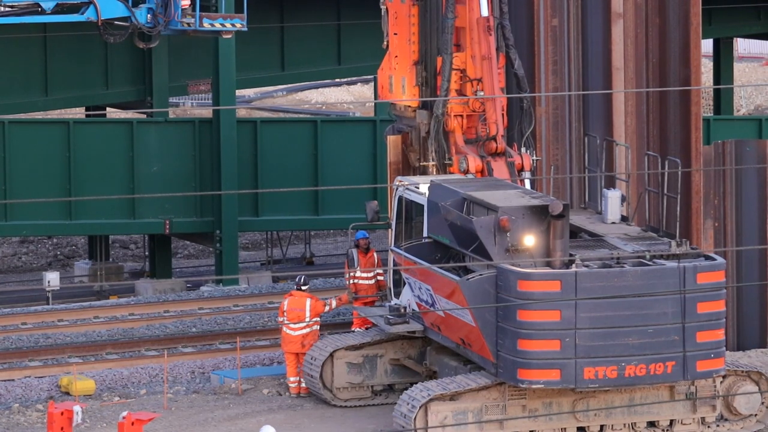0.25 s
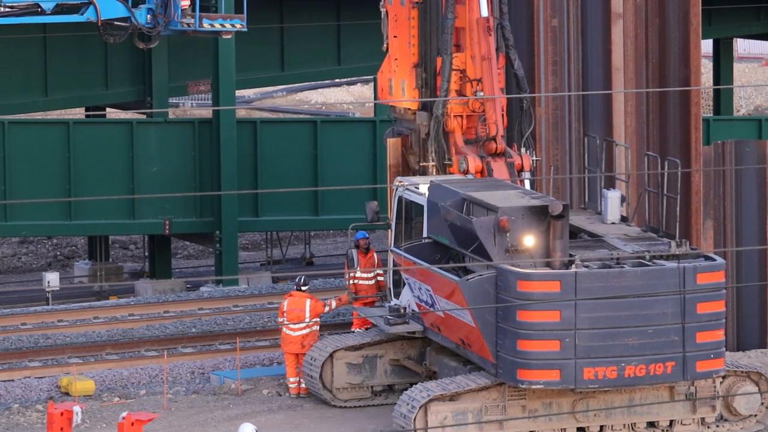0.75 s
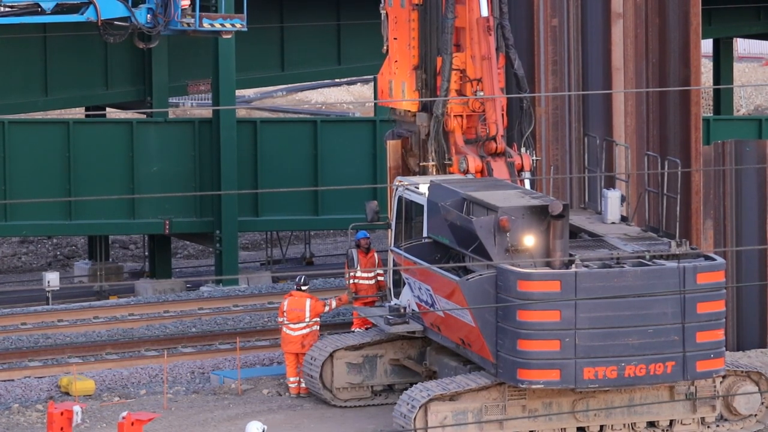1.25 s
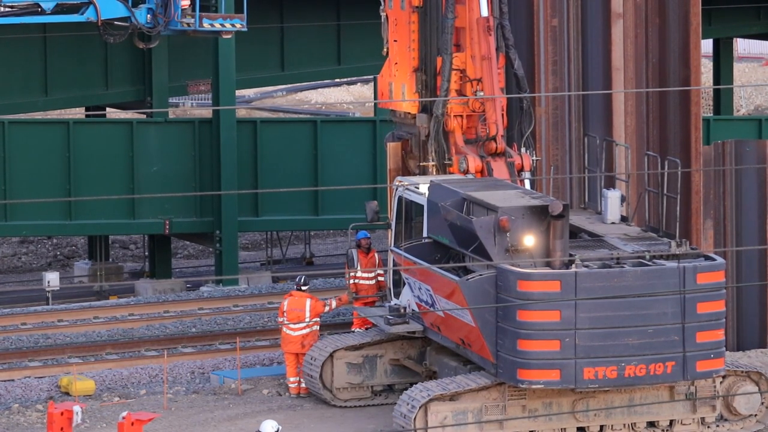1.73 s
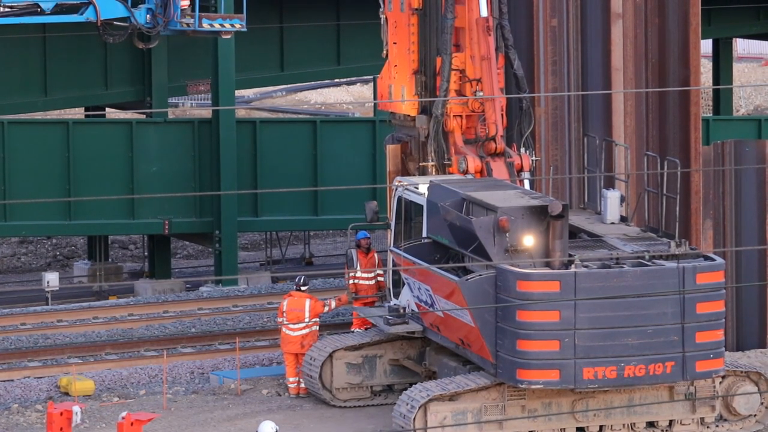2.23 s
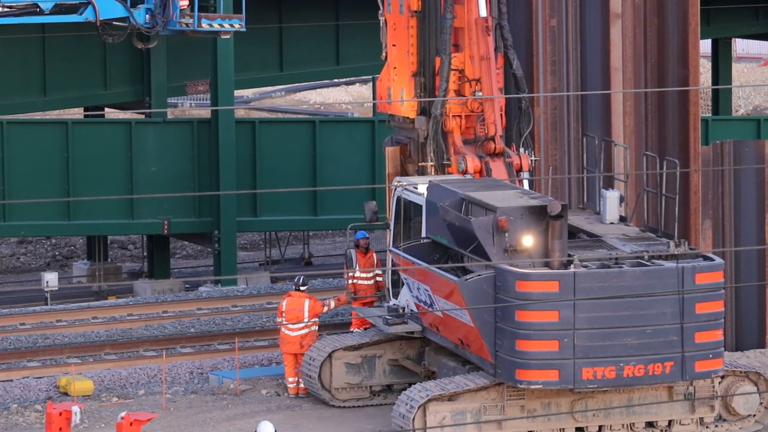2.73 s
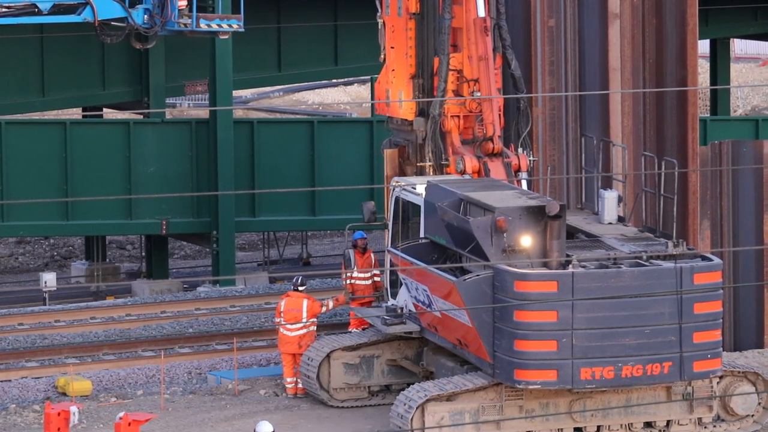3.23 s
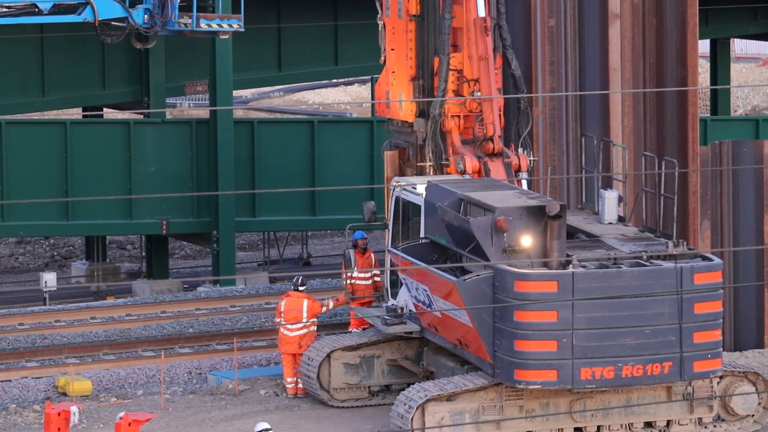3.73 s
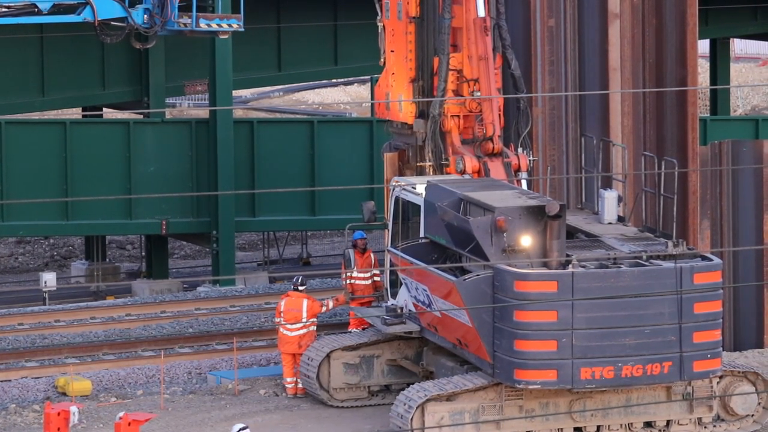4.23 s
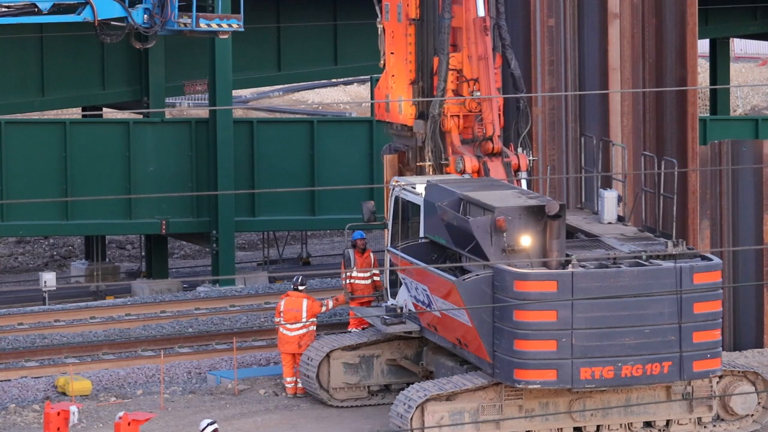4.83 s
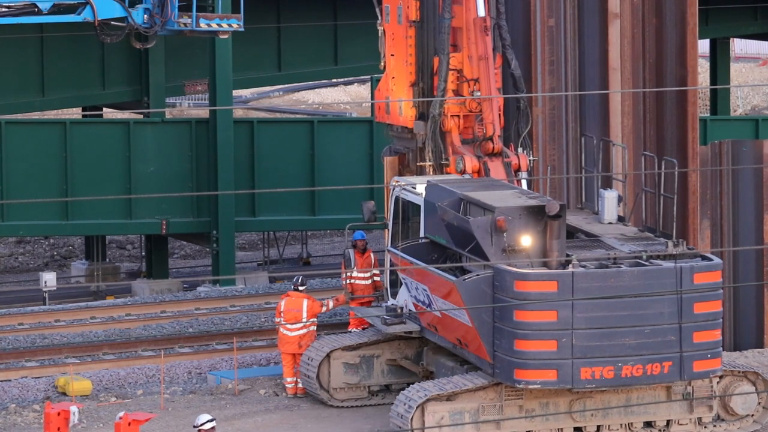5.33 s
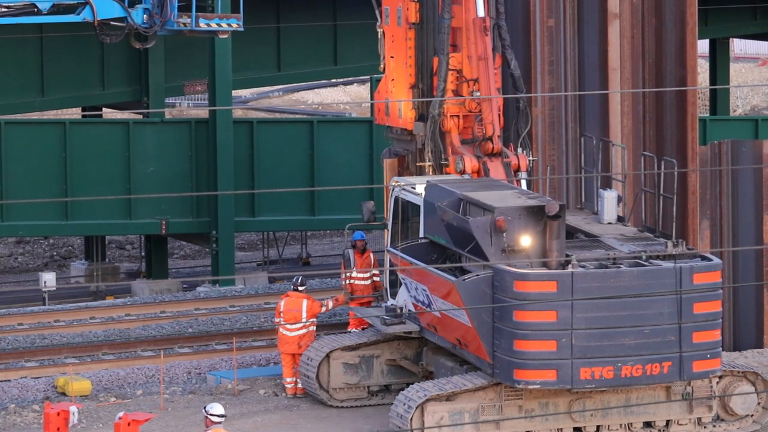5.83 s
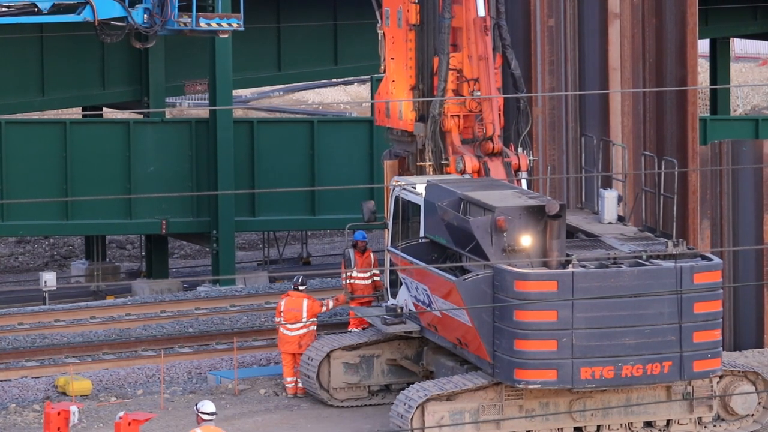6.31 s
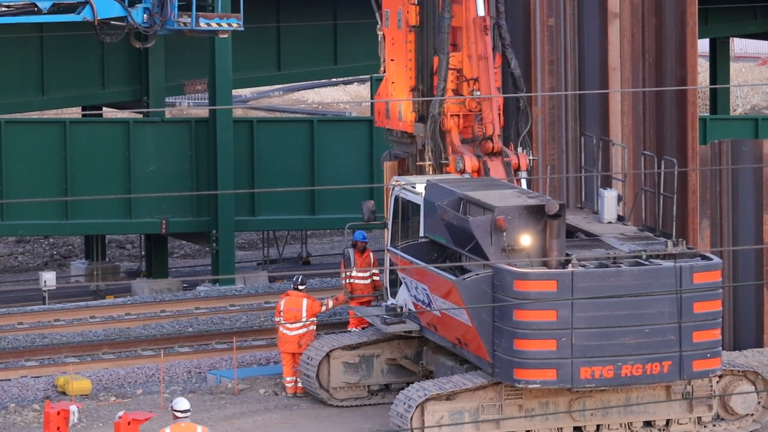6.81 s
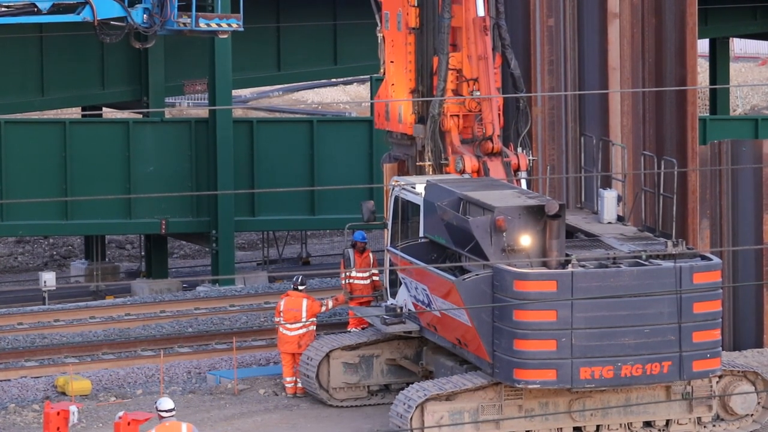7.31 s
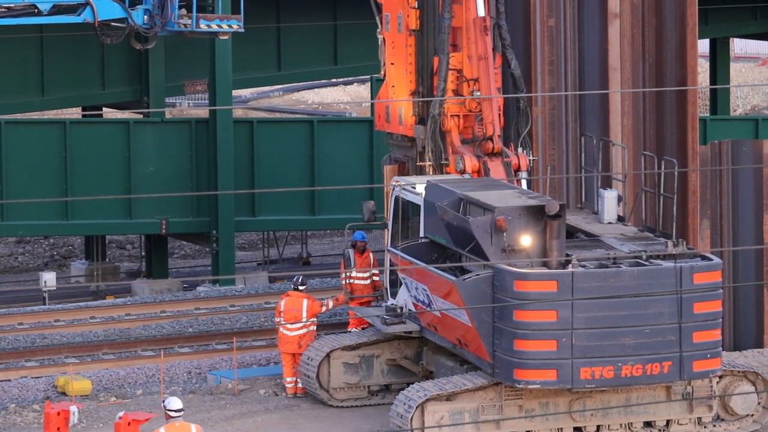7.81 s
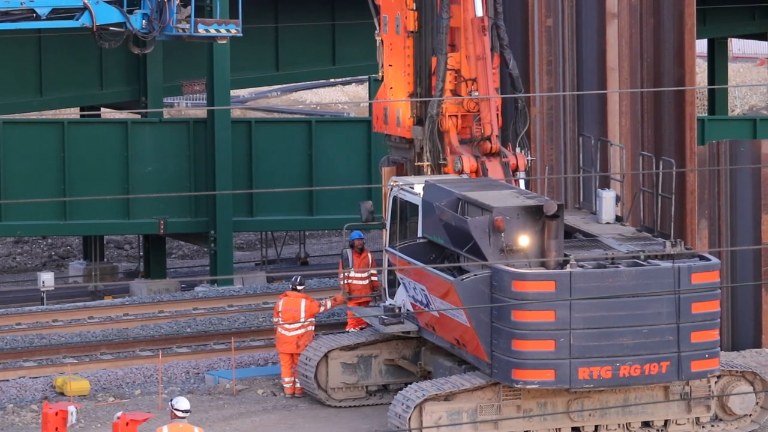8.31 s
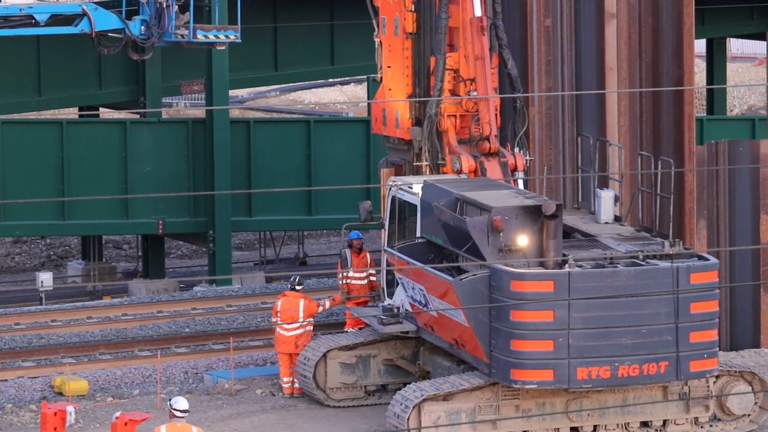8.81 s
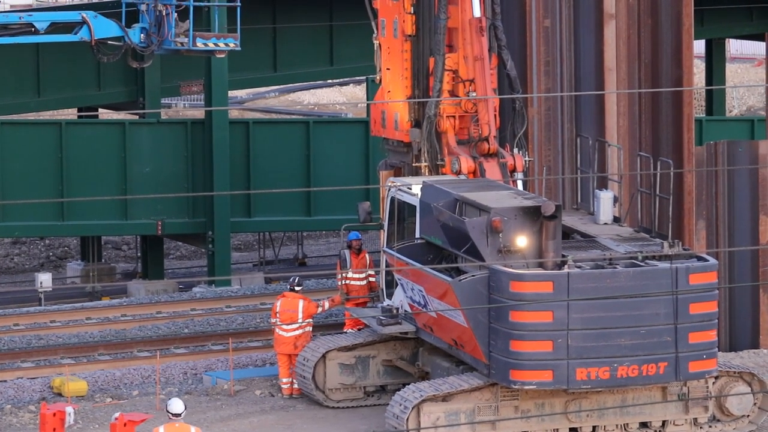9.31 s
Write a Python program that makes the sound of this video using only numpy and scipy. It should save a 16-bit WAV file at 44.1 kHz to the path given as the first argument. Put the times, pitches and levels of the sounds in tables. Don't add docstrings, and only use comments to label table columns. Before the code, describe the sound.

A vibratory hammer buzzes hard and steadily on a steel sheet pile, metal rattling fast and ringing, over an even diesel roar outdoors.

```python
import sys
import numpy as np
from scipy import signal
from scipy.fft import rfft, irfft, next_fast_len
from scipy.io import wavfile
from scipy.ndimage import uniform_filter1d, map_coordinates

SR = 44100
rng = np.random.default_rng(int(sys.argv[2]) if len(sys.argv) > 2 else 0)


def gain_from_decibels(decibels):
    exponent = np.asarray(decibels, float) / 20
    return 10 ** exponent


def pcm_store(signal):
    levels = np.round(np.clip(np.atleast_2d(signal), -1, 1) * 32767)
    wavfile.write(sys.argv[1], SR, levels.astype(np.int16).T)


N = 421596

# time in seconds, stony share 0-1, firm share 0-1, loss of the high orders in dB.
GROUND = [(0, .85, 0, 14), (1.1, .85, 0, 14), (1.35, .6, 0, 14), (1.9, .65, 0, 14), (2.2, 1, 0, 13),
          (3.35, 1, 0, 12), (3.5, 0, 0, 8), (4.05, 0, 0, 0), (5.35, 0, 0, 0), (5.75, 0, 1, 0),
          (9.56, 0, 1, 0)]


def unit(x):
    return x / np.sqrt(np.mean(x ** 2) + 1e-20)


def along(points, hz):
    f, v = np.transpose(points)
    return np.interp(np.log(hz + 1), np.log(f + 1), v)


def curves(rows):
    s, *cols = np.transpose(rows)
    return [np.interp(np.arange(N) / SR, s, c) for c in cols]


def spells(rows):
    t = np.arange(0, N + 64, 64) / SR
    total = 0 * t
    for centre, length, size in rows:
        total = total + size * np.exp(-(2 * (t - centre) / length) ** 2)
    return np.repeat(total, 64)[:N]


def wobble(rate, size=1):
    rate = min(rate, 40)
    knots = rng.standard_normal(int(N * 40 / SR) + 4)
    return map_coordinates(knots, [np.arange(0, N, size) * rate / SR])


def filtered(x, response):
    m = next_fast_len(N + SR // 2)
    return irfft(rfft(x, m) * response(np.fft.rfftfreq(m, 1 / SR)), m)[..., :N]


def hum(turns, speed, bounce):
    # multiple of shaft rate, loose soil in dB, firm soil in dB.
    low_orders = [(1, -11.5, -14.5), (2, -17, -15.5), (3, 2, 0), (4, -6, -5.5), (5, -7, -12.5),
                  (6, -36, -19), (7, -6, -11), (8, -0.5, -2), (9, -16.5, -16), (10, -16, -43),
                  (11, -6.5, -10.5), (12, -26, -9.5), (13, -2.5, -3), (14, -3.5, -3), (15, -11, -16)]
    # multiple of shaft rate, level in dB.
    bounce_orders = [(0.5, -33), (1, -10.5), (1.5, -26), (2, -26), (2.5, -4), (3, 1.5), (3.5, -9), (4, -2),
                     (4.5, -7), (5, -5.5), (5.5, -32), (6, -32), (6.5, -17.5), (7, -0.5), (7.5, -8.5),
                     (8, -10.5), (8.5, -41), (9, -8), (9.5, -20), (10, -12.5), (10.5, -18), (11, -10.5),
                     (11.5, -29), (12, -8), (12.5, -5), (13, -7), (13.5, -7.5), (14, -9), (14.5, -14),
                     (15, -4.5)]
    # centre in Hz, width in Hz, gain in dB.
    lifts = [(913, 15, 2.5), (1159, 20, 7), (1504, 14, 1)]
    # centre in seconds, length in seconds, gain in dB.
    chatter = [
        (.5, 1, 3.5),
        (1.6, 1, 14.5),
    ]
    # centre in seconds, length in seconds, gain in dB.
    loads = [(1.1, 0.56, 0.3), (1.75, .7, -4.5), (3.5, 0.33, -1.7), (6.8, 0.5, -0.7), (7.9, 0.81, 1.8),
             (8.6, .5, 0.3)]
    comb_loose_db, comb_firm_db, comb_scatter_db = -22, -36, 1.5
    lift_firm_db = -7
    steady_wander = .45

    step = 8
    turns, speed, mix = turns[::step], speed[::step], np.clip(bounce[::step], 0, 1.3)
    stony, grip, loss_db = np.array(curves(GROUND))[:, ::step]
    calm = 1 - (1 - steady_wander) * (1 - grip) * (1 - stony)
    chatter_db = spells(chatter)[::step]
    low = {round(k): levels for k, *levels in low_orders}
    bouncing = dict(bounce_orders)
    pair = np.zeros((2, len(turns)))
    for k in sorted({*range(1, 41), *bouncing}):
        if k in low:
            loose_db, firm_db = low[k]
            db = (1 - grip) * loose_db + grip * firm_db
        elif k in bouncing:
            db = -25.0
        else:
            scatter_db = comb_scatter_db * rng.standard_normal()
            level = gain_from_decibels(comb_loose_db + grip * (comb_firm_db - comb_loose_db) + scatter_db)
            for centre, width, gain_db in lifts:
                detuning = 2 * (k * speed - centre) / width
                level = level + gain_from_decibels(gain_db + lift_firm_db * grip) / np.hypot(1, detuning)
            db = 20 * np.log10(level)
        if k in bouncing:
            hop = stony if k in low else mix
            db = db + hop * (bouncing[k] - db)
        else:
            db = db - loss_db
        if k % 1 > 0 and 6 < k < 14:
            db = db + chatter_db
        sway_db = min(.5 + .08 * k, 1.5) * wobble(3.1, size=step)
        start = [[k * k / 4], [k * k / 4 + .25 + .08 * rng.standard_normal()]]
        wander = calm * min(0.043 * k, .07) * wobble(4.5, size=step)
        pair += gain_from_decibels(db + sway_db) * np.sin(2 * np.pi * (k * turns + start + wander))
    level_db = -32.5 - 0.6 * wobble(1.5, size=step) + spells(loads)[::step]
    return signal.resample_poly(np.sqrt(2) * gain_from_decibels(level_db) * pair, step, 1, axis=1)[:, :N]


def repeating(turns, period, drift):
    size = 1160 * period
    shapes = rng.standard_normal((2, 60, size))
    place = (turns / period % 1 * size).astype(int) % size
    age = np.arange(N) / SR * np.clip(drift, .1, 6)
    old, fade = age.astype(int), age % 1 * np.pi / 2
    return np.cos(fade) * shapes[:, old, place] + np.sin(fade) * shapes[:, old + 1, place]


def rattle(turns, bounce, repeat, firm):
    # centre in seconds, length in seconds, strength of the limp, its
    limps = [(1.5, 0.64, 1), (1.85, 0.53, .7), (3.0, 0.15, -0.61), (3.75, 0.86, -0.57), (6.35, 0.22, 0.1),
             (7.4, 0.25, -0.78), (7.9, 0.34, -.5), (8.5, 0.53, -1.6), (9.3, .5, -0.83)]
    # centre in seconds, length in seconds, burst depth in dB.
    throbs = [(.45, .6, 1.8), (1.0, 0.43, 0), (3.7, 0.55, .6), (4.35, 0.14, -2.5), (4.9, 0.78, 0.5),
              (5.2, .3, -1.5), (7.3, 0.56, 1.5), (8.45, 0.42, -0.5), (9.3, 0.25, 0.5)]
    limp = spells(limps)
    throb_db = 1.35 + 0.4 * firm + spells(throbs)

    odd = np.clip(.5 * bounce + 0.11 * abs(limp), 0, 1)
    each_turn = repeating(turns, period=1, drift=1.588)
    every_second = repeating(turns, period=2, drift=3.2)
    same = np.sqrt(1 - odd) * each_turn + np.sqrt(odd) * every_second
    repeat = np.clip(repeat, 0, 1)
    contacts = np.sqrt(repeat) * same + np.sqrt(1 - repeat) * rng.standard_normal((2, N))

    angle = 2 * np.pi * (turns - .27)
    uneven = limp * np.cos(angle / 2 + 2.7)
    burst = np.cos(angle) + 0.35 * np.cos(2 * angle + 0.87) + 0.59 * uneven
    since = (turns - .11) % 1
    blow = np.exp(-since / 0.06) * gain_from_decibels(-3.5 + throb_db + 10.5 * uneven + 2.5 * wobble(35))
    force = gain_from_decibels(throb_db * burst + 0.17 * wobble(30) + 0.87 * wobble(10)) + blow
    return contacts * force / np.sqrt(np.abs(uniform_filter1d(force ** 2, size=SR // 5)))


def pile(blows, steady):
    mode_hz = [522, 902, 1145, 1488, 1955, 2503, 2828, 3355, 3790, 4890, 5625, 6070, 7760, 8790, 9660,
               11900, 15080]
    # width in Hz, level in dB.
    mode_shape = [(50.6, -7), (22.9, 1), (31.3, -7.5), (26.5, -4.5), (62, -12), (41.7, -13.5),
                  (29.6, -12.5), (37.2, 1), (29.6, -13.5), (44.4, -4.5), (40.6, -8.5), (60, -13.5),
                  (45, -20.5), (200, -18.5), (110, -26), (510, -23), (150, -42)]
    group_hz = [0, 700, 1020, 1330, 2660, 3080, SR]
    parts_db = [
        -34.5,
        -28.5,
        -28.5,
        -24,
        -33,
        -25.5,
    ]
    depth_db = [
        -2,
        -3.5,
        -9,
        -4,
        0,
        4.5,
    ]
    swells = {0: [(.55, 0.23, -10), (1.5, 0.44, 6.5), (3.1, 1, 7), (4.0, .5, 9), (4.9, 0.73, -23),
              (5.65, 0.58, 4.5)], 1: [(3.5, 0.28, 1), (6.4, 0.94, 4), (8.0, 0.2, 7.5), (8.8, 0.41, 7)],
              2: [(1.0, .4, 1.5), (2.65, 0.41, 5.5), (3.4, 0.61, 8), (4.7, 1.2, -4), (8.15, 0.44, 6.5),
              (9.05, 0.17, 8.5)], 3: [(.7, 0.53, -2), (1.5, 0.58, -4), (2.3, 0.36, 1), (3.65, 0.17, -0.5),
              (4.7, 1, -1.5), (6.5, 0.27, 3), (9.2, 0.12, 5)], 4: [], 5: [(.1, 0.32, 3), (1.7, 0.36, 1.5),
              (5.9, 0.36, 1), (9.35, 0.14, -0.5)]}
    # centre in seconds, length in seconds, gain in dB.
    sings = [(.4, .4, 10), (1.5, 0.61, 23), (3.65, 0.32, 18), (4.35, 0.37, 21), (4.9, 0.59, 16.5),
             (5.45, .3, 21), (5.95, .4, 16), (6.25, 0.27, 17), (6.9, 0.6, 16.5), (7.6, .4, 14),
             (8.2, 0.83, 16.5), (9.2, .5, 12)]
    # frequency in Hz, density in dB per Hz.
    clatter = [(90, -20), (200, 5), (400, -0.5), (720, -0.5), (1000, 6), (1700, -17), (3400, 4), (5700, -7),
               (7000, -5.5), (9000, -11), (10500, -16), (12000, -8), (14000, -52), (16000, -25)]
    flange_damping = 0.77
    sing_hz, sing_width_hz, sing_db = 2828, 14, -46.5

    def mode(f, centre, width):
        return 1j * f * width / (centre ** 2 - f * f + 1j * f * width)

    def ringing(f):
        total = 0
        for k, (centre, (width, db)) in enumerate(zip(mode_hz, mode_shape)):
            total = total + (-1) ** k * gain_from_decibels(db) * mode(f, centre, width)
        return total * ((f >= edges[:-1]) & (f < edges[1:]))

    edges = np.reshape(group_hz, (-1, 1, 1))
    parts = filtered(blows, ringing)
    out = gain_from_decibels(-27.5 - 0.5 * steady) * unit(filtered(blows, lambda hz: gain_from_decibels(along(clatter, hz))))
    swell_db = [spells(rows) for rows in swells.values()]
    swell_db[2] = swell_db[2] - flange_damping * np.maximum(swell_db[0], 0)
    depth = np.arange(N) / N - .5
    for part, rest_db, deep_db, more_db in zip(parts, parts_db, depth_db, swell_db):
        flutter_db = .6 * np.repeat(wobble(5.5, size=64), 64)[:N]
        out = out + gain_from_decibels(rest_db + deep_db * depth + more_db + flutter_db) * unit(part)
    song = filtered(blows, lambda f: mode(f, sing_hz, sing_width_hz))
    return out + gain_from_decibels(sing_db + spells(sings)) * unit(song)


def engine():
    # frequency in Hz, density in dB per Hz.
    roar_db = [(11, -45), (18, -25), (108, -5), (218, -8), (515, 0.5), (723, -7), (890, -3), (1500, 0.5),
               (1750, -3.5), (3440, -6.5), (5780, -17), (7900, -18.5), (9000, -19.5), (11700, -55),
               (19800, -120)]
    roar = filtered(rng.standard_normal((2, N)), lambda hz: gain_from_decibels(along(roar_db, hz)))
    return gain_from_decibels(-24.5 + 0.18 * wobble(4.3)) * unit(roar)


def spread(pair):
    # frequency in Hz, correlation of left and right.
    likeness = [(60, 1), (130, 0.98), (290, 0.97), (640, 0.88), (1410, 0.84), (3100, 0.65), (5500, 0.61),
                (7500, 0.061), (15000, 0.13)]

    def rotation(hz):
        turn = np.arccos(np.clip(along(likeness, hz), -1, 1)) / 2
        return np.array([np.cos(turn), np.sin(turn)])

    mid, side = filtered(pair, rotation)
    return np.array([mid + side, mid - side])


def scene():
    # time in seconds, shaft rate in Hz.
    shaft = [(0.0, 38.467), (0.9, 38.48), (1.6, 37.806), (2.4, 37.879), (3.0, 37.97), (3.6, 38.128),
             (4.2, 38.21), (5.15, 38.347), (5.75, 37.742), (6.3, 37.68), (7.3, 37.569), (8.1, 37.662),
             (8.8, 37.713), (9.56, 37.793)]
    speed, = curves(shaft)
    turns = np.cumsum(speed) / SR
    stony, firm, loss_db = curves(GROUND)
    steady = (1 - firm) * gain_from_decibels(-loss_db) * (1 - stony)
    bounce = .1 + .9 * stony
    repeat = .33 + .17 * steady
    blows = rattle(turns, bounce, repeat, firm)
    return spread(hum(turns, speed, bounce) + pile(blows, steady) + engine())


def starved(x, kept, together, sparse):
    window = signal.windows.kaiser_bessel_derived(2048, 4 * np.pi)
    hz, _, z = signal.stft(x, SR, window, nperseg=len(window))
    luck = rng.standard_normal((33, z.shape[1])) + together * rng.standard_normal(z.shape[1])
    luck = uniform_filter1d(luck, size=3, axis=1) + 0.5 * luck
    rank = luck.argsort(axis=1).argsort(axis=1) / z.shape[1]
    share = along(kept, hz[::32] + 345)
    share[hz[::32] < 6800] = 1
    keep = np.repeat(rank < share[:, None], 32, axis=0)[:len(hz)]
    threshold = sparse * np.clip((hz[:, None] - 5500) / 9000, 0, 1)
    strong = abs(z) >= threshold * uniform_filter1d(abs(z), size=32, axis=0)
    return signal.istft(z * keep * strong, SR, window, nperseg=len(window))[1][:N]


def roll_off(x):
    return signal.sosfilt(signal.butter(12, 15360, fs=SR, output="sos"), x)


def record(dry):
    # frequency in Hz, left minus right in dB.
    tilt = [(60, 2), (110, -0.5), (200, 0.5), (380, 0), (700, 1.5), (1290, -1.0), (2380, -1.5), (4400, -1),
            (8120, 0), (15000, 0)]
    # frequency in Hz, lead of the left in radians.
    lead = [(500, .02), (1550, 0.14), (2500, 0.33), (3620, 0.54), (5170, 0.34), (7000, 0.13)]
    # frequency in Hz, share of frames 0-1.
    kept_mid = [(6500, 0.83), (7100, 0.53), (8000, 0.42), (8800, 0.56), (9600, 0.21), (10600, 0.11),
                (11800, .27), (13000, 0.12), (14300, 0.17), (15100, .2), (15500, .02)]
    # frequency in Hz, share of frames 0-1.
    kept_side = [(7000, 1), (9300, 0.94), (10000, .85), (10600, .6), (11300, 1), (12200, 0.9), (12900, .7),
                 (14000, .6), (14800, .9), (15500, .01)]
    half = np.array([[.5], [-.5]])
    left, right = filtered(dry, lambda hz: gain_from_decibels(half * along(tilt, hz)) * np.exp(1j * half * along(lead, hz)))
    mid = starved((left + right) / 2, kept_mid, together=.4, sparse=1.7)
    side = starved((left - right) / 2, kept_side, together=.2, sparse=2.1)
    return roll_off(np.array([mid + side, mid - side]))


dry = scene()
out = record(dry)
pcm_store(out)
```